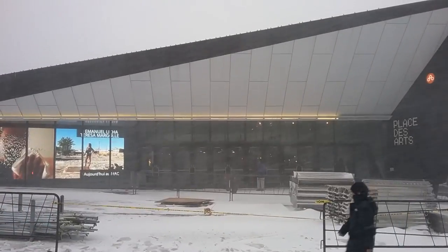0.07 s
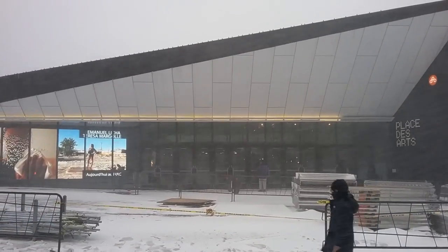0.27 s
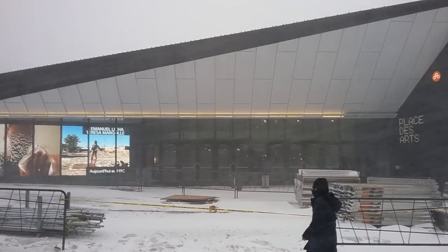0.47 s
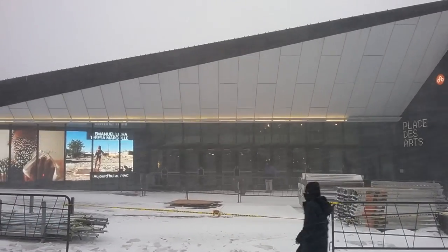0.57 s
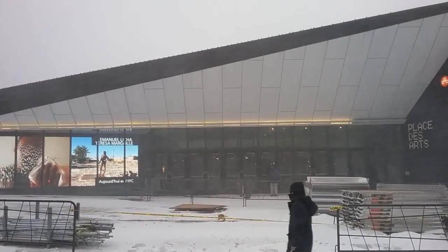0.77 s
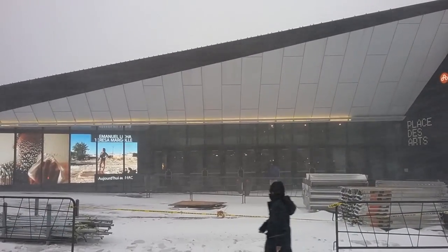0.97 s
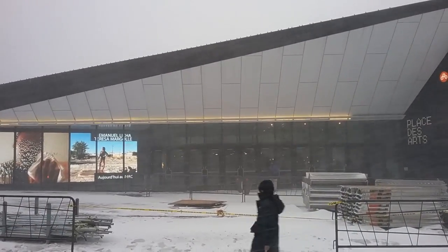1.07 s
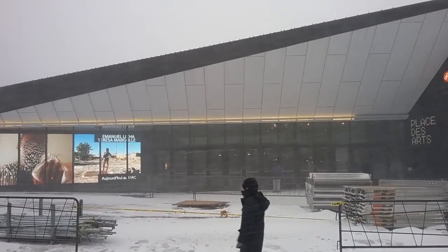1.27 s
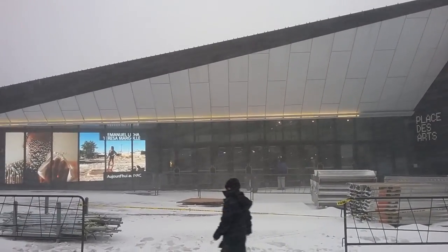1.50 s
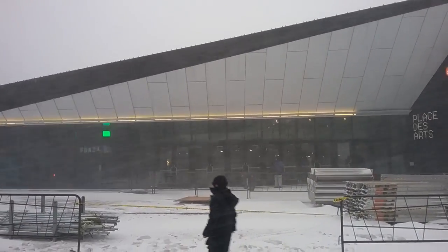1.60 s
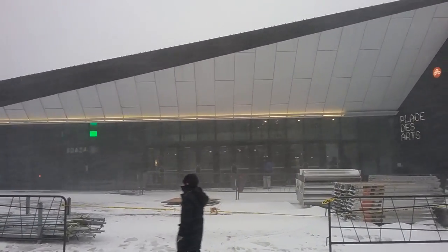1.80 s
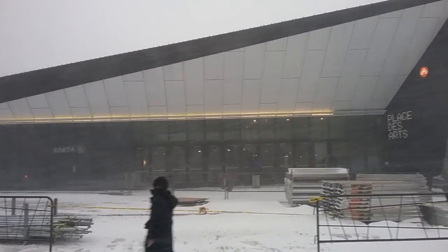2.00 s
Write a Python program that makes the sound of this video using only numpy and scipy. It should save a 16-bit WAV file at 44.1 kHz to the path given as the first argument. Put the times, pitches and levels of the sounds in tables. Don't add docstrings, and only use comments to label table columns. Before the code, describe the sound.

Strong wind batters a phone microphone in an open snowy square: low rumble and thumps, a slightly calmer middle, then a harder blast with rough, bright tearing bursts before it eases a little.

```python
import sys
import numpy as np
from scipy import signal
from scipy.fft import rfft, irfft
from scipy.io import wavfile
from scipy.ndimage import uniform_filter1d, minimum_filter1d, map_coordinates

SR = 44100
rng = np.random.default_rng(int(sys.argv[2]) if len(sys.argv) > 2 else 0)


def master_out(mix):
    frames = np.transpose(np.atleast_2d(mix))
    ceiling = np.clip(frames, -1, 1)
    pcm = np.round(ceiling * 32767).astype(np.int16)
    wavfile.write(sys.argv[1], SR, pcm)


def volts_from_decibels(level):
    exponent = np.asarray(level, float) / 20
    return 10 ** exponent


N = 90228

# time_s, buffet_level_db, fine_eddy_level_db, large_eddy_share_db
GUSTS = [(0.0, -13, -37, -16.5), (0.085, -19, -35, -10.5), (0.129, -20.5, -33, -8),
         (0.29, -19, -37.5, -5.5), (0.36, -19, -39.5, -7.5), (0.569, -18, -43, -6),
         (0.63, -19.5, -44, -9.5), (0.679, -17.5, -38, -4.5), (0.819, -18.5, -41, -6), (0.97, -16, -39, -7),
         (1.178, -17, -38, -10.5), (1.221, -16, -38, -7), (1.271, -17, -37, -12.5), (1.33, -15, -35, -8),
         (1.609, -12, -26, -9.5), (1.818, -14.5, -30, -8), (2.04, -15.5, -35, -9.5)]
# peak_s, rip_level_db,
# spray_level_db
TIGHT_WHIRLS = [(0.0083, -24.5, -48), (0.0233, -15.5, -34), (0.0356, -24.5, -64), (0.0489, -26, -60),
                (0.0649, -25.5, -43), (0.0973, -30, -66), (0.1077, -26, -73), (0.1186, -26.5, -76),
                (0.1484, -28, -63.5), (0.1569, -26, -67.5), (0.1661, -17, -41), (0.1857, -35, -71.5),
                (0.2044, -30, -71), (0.2192, -18, -75), (0.2273, -29, -69), (0.2412, -21, -78),
                (0.2585, -33, -69), (0.2742, -28.5, -79), (0.2973, -27.5, -80), (0.3204, -24, -66),
                (0.3328, -37, -70.5), (0.3484, -29.5, -66), (0.3954, -23, -46.5), (0.4064, -18, -27.5),
                (0.4129, -20, -49.5), (0.4527, -43, -45), (0.474, -27, -61), (0.4802, -24, -70),
                (0.4893, -16, -61), (0.4972, -14, -33),
                (0.5287, -13, -41.5), (0.543, -33, -55), (0.5533, -33, -38.5), (0.5651, -35, -51),
               (0.622, -44, -57), (0.639, -36, -67), (0.7153, -30.5, -51), (0.766, -25, -35.5),
               (0.8048, -35.5, -53), (0.8344, -38, -72), (0.8471, -38, -75), (0.8705, -24, -70.5),
               (0.8823, -29.5, -80), (0.8897, -27, -75), (0.9044, -35.5, -72), (0.9174, -29, -77),
               (0.9341, -19, -67), (0.9529, -21, -66), (0.9635, -22, -31), (0.969, -18.5, -32.5),
               (0.9882, -19, -41.5), (0.9997, -15, -41), (1.0134, -23.5, -59), (1.039, -14, -73),
               (1.0495, -34.5, -72), (1.0632, -31, -70), (1.071, -26, -55), (1.0787, -22, -82.5),
                (1.1064, -28, -77.5), (1.113, -25, -76), (1.1245, -26, -65.5), (1.138, -30.5, -85),
                 (1.159, -38.5, -67), (1.1708, -31.5, -67), (1.1854, -40.5, -49), (1.2224, -27.5, -71),
                 (1.2593, -36, -70), (1.2715, -36, -69), (1.2913, -20.5, -70), (1.2972, -20.5, -78),
                 (1.3133, -24.5, -71), (1.321, -23, -59), (1.3474, -23.5, -67), (1.3741, -29.5, -62),
                 (1.385, -12.5, -64.5), (1.3917, -24, -43.5), (1.4045, -16, -28), (1.425, -18.5, -48),
                 (1.4418, -23, -39), (1.4554, -18, -59), (1.465, -11, -21), (1.4887, -26.5, -63),
                 (1.4977, -18, -39.5), (1.5208, -14.5, -19), (1.5341, -22, -72), (1.5462, -20, -29),
                (1.5625, -9, -22), (1.585, -23.5, -34), (1.598, -16, -31), (1.6111, -27.5, -38.5),
                (1.6258, -22, -51), (1.6594, -19, -33.5), (1.669, -18.5, -42.5), (1.705, -13, -17),
                (1.7244, -26, -36), (1.7339, -25, -66), (1.7437, -23, -54), (1.7574, -11, -24),
                (1.769, -11.5, -24.5), (1.778, -16.5, -55), (1.788, -23.5, -53), (1.7981, -15.5, -22.5),
                (1.8303, -13, -26), (1.8349, -13, -23), (1.84, -10, -36), (1.855, -20.5, -27),
                (1.8784, -21, -33), (1.8844, -15, -31.5), (1.9062, -20, -66), (1.9258, -31.5, -58),
                (1.9472, -29.5, -62.5), (1.9651, -28, -70.5), (1.983, -36.5, -71), (1.9964, -19, -50),
                (2.0147, -29, -64.5), (2.023, -28.5, -71.5),
                (.389, -17, -34), (.372, -33.5, -62), (.975, -24.5, -55.5), (0.98, -22.5, -40),
                  (0.996, -25, -63), (1.437, -20.5, -32.5), (1.470, -16, -16), (1.503, -20, -26),
                  (1.571, -21.5, -15), (1.711, -19.5, -38.5), (1.762, -18.5, -33.5), (1.803, -26, -62.5),
                  (1.861, -21.5, -51), (1.874, -22.5, -31), (1.952, -26.5, -64.5), (.305, -30, -71),
                  (0.655, -38.5, -56), (0.676, -35.5, -74), (0.694, -34, -56), (1.476, -21.5, -39),
                  (1.554, -23.5, -40), (1.604, -23.5, -51), (1.616, -24, -48), (1.635, -27, -63),
                  (1.795, -17, -56), (1.851, -24.5, -45), (0.944, -28, -72.5), (1.029, -30, -70)]
WHIRLS = TIGHT_WHIRLS
# peak_s, peak_db, pitch_hz
THUMPS = [(0.0, -9.5, 92.5), (0.013, -4, 104), (0.021, -4.5, 182), (0.058, -10, 114), (0.42, -10.5, 131),
          (0.464, -12.5, 150), (0.485, -7, 182), (0.528, -9.5, 325), (0.558, -13.5, 160),
          (0.759, -8.5, 184), (0.866, -7, 196.5), (0.885, -10, 110), (0.937, -11.5, 165), (0.964, -7, 324),
          (0.973, -10, 111), (0.974, -7.5, 241), (0.984, -5, 153), (0.99, -8, 275), (0.999, -9.5, 130.0),
          (1.047, -14.5, 237), (1.045, -4, 132), (1.066, -6.5, 141.0), (1.133, -11.5, 91.6),
          (1.225, -6, 97), (1.312, -8, 215.8), (1.324, -9, 143.8), (1.331, -7, 77.0), (1.346, -13, 219),
          (1.38, -5, 139.5), (1.394, -8.5, 100.2), (1.415, -5, 119.0), (1.429, -11, 168.0),
          (1.442, -3.5, 118), (1.454, -12.5, 200.7), (1.477, -7.2, 218.0), (1.483, -8, 92.4),
          (1.5, -26, 183.0), (1.51, -4, 238.0), (1.524, -11, 280), (1.533, -5, 210), (1.542, -7, 243),
          (1.552, -12, 117.7), (1.585, -9, 102), (1.611, -4, 99.4), (1.618, -18, 237), (1.63, -7, 216),
          (1.699, -12.5, 197.4), (1.711, -11.5, 281.8), (1.736, -8.5, 165.7), (1.768, -8.0, 314.1),
          (1.781, -8, 213.7), (1.796, -10.5, 278.6), (1.799, -10.5, 167.2), (1.838, -4.5, 168.0),
          (1.854, -14, 119.3), (1.878, -21, 187), (1.894, -3, 145.4), (1.931, -7.0, 167.9),
          (1.967, -10, 239), (2.002, -9.5, 91.9)]
# start_s, level_db
ICE_GRAINS = [(0.0177, -61.5), (0.067, -50), (0.5494, -51.5), (0.636, -55), (0.7387, -63.5),
              (0.7632, -53.5), (1.049, -54), (1.1837, -47), (1.318, -59.5), (1.4333, -55), (1.469, -43),
              (1.5184, -46.5), (1.5693, -31.5), (1.5846, -53), (1.7218, -58.5), (1.854, -54)]
# frequency_hz, level_db_per_hz
EDDY_SPECTRUM = [(30, -5), (130, 6.5), (370, -7.5), (600, -13), (1200, -32), (2400, -61.5), (4000, -81.5)]
# frequency_hz, level_db_per_hz
SPRAY_SPECTRUM = [(800, -15), (2500, 9), (4800, -2), (6300, -2.5), (9000, -3)]
# frequency_hz, level_db_per_hz
HISS_SPECTRUM = [(2000, -18), (4300, -31), (6400, -18), (7500, -30), (8500, -40), (10000, -41),
                 (16000, -35)]
HISS_DB = -64.5


def unit(x):
    return x / np.sqrt(np.mean(x ** 2))


def coloured(spectrum, size):
    hz, db = np.array(spectrum, float).T
    bin_hz = np.maximum(np.arange(size // 2 + 1) * SR / size, 1)
    gain = volts_from_decibels(np.interp(np.log(bin_hz), np.log(hz), db))
    return unit(irfft(rfft(rng.standard_normal(size)) * gain, size))


def steady(x, size=SR // 20):
    power = uniform_filter1d(uniform_filter1d(x ** 2, size), size)
    return unit(x / np.sqrt(power + 1e-12))


def walk(per_s):
    places = np.arange(N) * per_s / SR
    return unit(map_coordinates(rng.standard_normal(2000), [places % 1990], order=3))


def band(x, hz, width_hz):
    return signal.lfilter(*signal.iirpeak(hz, hz / width_hz, fs=SR), x)


def butter(x, order, hz, kind="low"):
    return signal.sosfilt(signal.butter(order, hz, kind, fs=SR, output="sos"), x)


def bump(t, peak_s, ms):
    late_ms = (t - peak_s) * 1000
    width_ms = np.where(late_ms < 0, 0.6 * ms, ms)
    return np.exp(-0.5 * (late_ms / width_ms) ** 2)


def near(peak_s):
    middle, reach = int(peak_s * SR), SR // 40
    return slice(max(middle - reach, 0), middle + reach)


def gust(t):
    time_s, *columns = np.array(GUSTS).T
    return [np.interp(t, time_s, column) for column in columns]


def air_speed(t):
    level_db, eddy_db, _ = gust(t)
    calm_oct = (eddy_db - level_db + 18) / 25
    calm_oct = calm_oct + 0.3 * walk(170) + 0.15 * walk(30)
    whirl_oct = np.full(N, -2.0)
    for peak_s, rip_db, _ in WHIRLS:
        peak_oct = (rip_db - gust(peak_s)[0] + 27) / 17
        part = near(peak_s)
        spurt = (peak_oct + 1) * bump(t[part], peak_s, ms=2.6) - 1
        whirl_oct[part] = np.maximum(whirl_oct[part], spurt)
    wake_ms = 18
    wake_oct = uniform_filter1d(np.maximum(whirl_oct, 0), int(wake_ms * SR / 1000))
    return np.clip(np.maximum(calm_oct + 0.7 * wake_oct, whirl_oct), -2, 2)


def buffet(t):
    speed_oct = air_speed(t)
    pattern = steady(coloured(EDDY_SPECTRUM, size=3 * N))
    eddies = map_coordinates(pattern, [np.cumsum(2 ** speed_oct)], order=3, mode="wrap")
    eddies = eddies * volts_from_decibels(-0.5 + 4.5 * speed_oct)
    bass = signal.sosfiltfilt(signal.butter(2, 260, fs=SR, output="sos"), eddies)
    bass_kept = np.minimum(volts_from_decibels(gust(t)[2] + 4), 1)
    return eddies - (1 - bass_kept) * bass


def rumble(t):
    return volts_from_decibels(1.35 + gust(t)[2]) * steady(butter(rng.standard_normal(N), 4, 143))


def whirl_spray(t):
    shape = np.zeros(N)
    for peak_s, _, spray_db in WHIRLS:
        part = near(peak_s)
        burst = bump(t[part], peak_s, ms=0.42) + volts_from_decibels(-19.5) * bump(t[part], peak_s, ms=3.9)
        shape[part] += max(volts_from_decibels(spray_db) - volts_from_decibels(HISS_DB), 0) * burst
    return volts_from_decibels(5.5) * shape * steady(coloured(SPRAY_SPECTRUM, size=N), size=SR // 1500)


def whirl_rips(t):
    shape = np.zeros(N)
    for peak_s, rip_db, _ in WHIRLS:
        part = near(peak_s)
        burst = bump(t[part], peak_s, ms=1.04) + volts_from_decibels(-13.5) * bump(t[part], peak_s, ms=4.8)
        shape[part] += volts_from_decibels(rip_db - 6) * burst
    torn_air = butter(band(rng.standard_normal(N), hz=1370, width_hz=374), 6, 2756)
    return shape * steady(torn_air, size=SR // 700)


def wind(t):
    gust_gain = volts_from_decibels(gust(t)[0])
    return gust_gain * (buffet(t) + rumble(t)) + whirl_spray(t) + whirl_rips(t)


def thumps(t):
    out = np.zeros(N)
    for peak_s, peak_db, pitch_hz in THUMPS:
        push_or_pull = np.sign(rng.standard_normal())
        turns = (t - peak_s) * pitch_hz
        fade = np.exp(-0.5 * (turns / 0.64) ** 2)
        swing = np.cos(2 * np.pi * turns + 0.5 * rng.standard_normal())
        out += push_or_pull * volts_from_decibels(peak_db - 1) * fade * swing
    return out


def snow_hiss():
    swell_db = 1.6 * (walk(9.8) + walk(30))
    return coloured(HISS_SPECTRUM, size=N) * volts_from_decibels(HISS_DB + swell_db)


def ice_ticks(t):
    shape = np.zeros(N)
    for start_s, level_db in ICE_GRAINS:
        late_s = t - start_s - 0.001
        fade_ms = 1.2
        shape += volts_from_decibels(level_db - 2) * (late_s >= 0) * np.exp(-np.abs(late_s) * 1000 / fade_ms)
    return butter(shape * rng.standard_normal(N), 2, 4500, "high")


def port(x):
    x = x - 2 * band(x, hz=4050, width_hz=140)
    x = butter(x, 5, 61.6, "high")
    top_drop_db, top_hz = 49.5, 8395
    return signal.sosfilt(signal.cheby2(8, top_drop_db, top_hz, fs=SR, output="sos"), x)


def scene():
    t = np.arange(N) / SR
    return (port(wind(t)) + thumps(t) + snow_hiss() + ice_ticks(t))[None]


def band_limit(x):
    return signal.sosfilt(signal.butter(12, 15830, fs=SR, output="sos"), x)


def record(dry):
    ceiling, span_ms = 0.93, 4
    span = int(span_ms * SR / 1000)
    gain = minimum_filter1d(ceiling / np.maximum(np.abs(dry), ceiling), 2 * span)
    gain = uniform_filter1d(uniform_filter1d(gain, span), span)
    return band_limit(dry * gain)


dry = scene()
out = record(dry)
master_out(out)
```